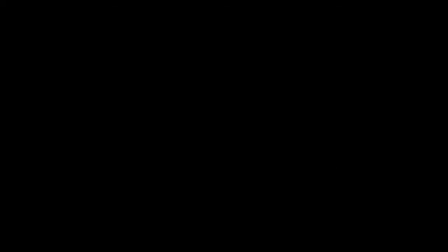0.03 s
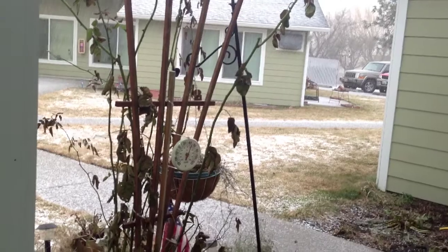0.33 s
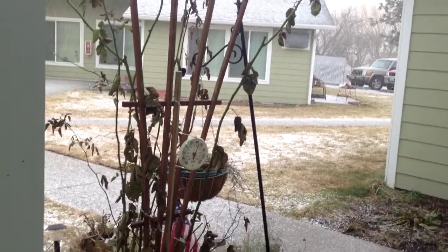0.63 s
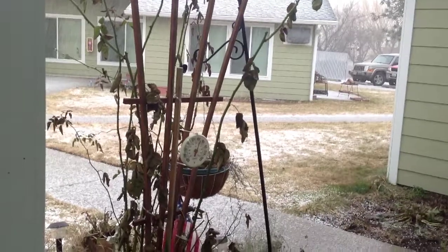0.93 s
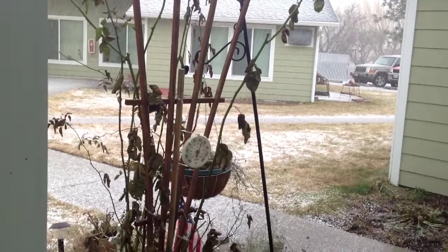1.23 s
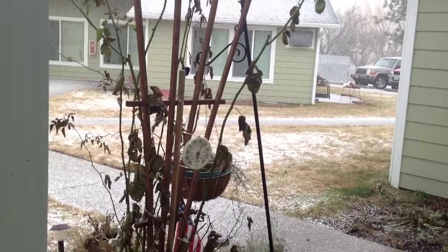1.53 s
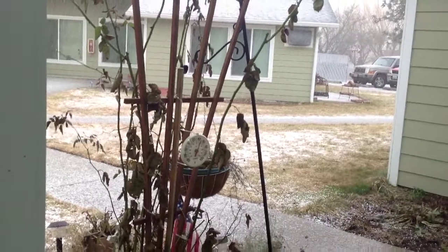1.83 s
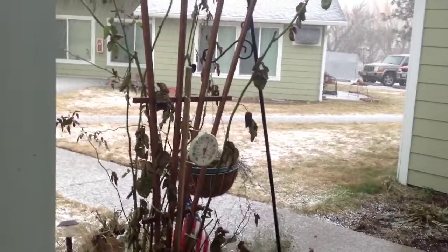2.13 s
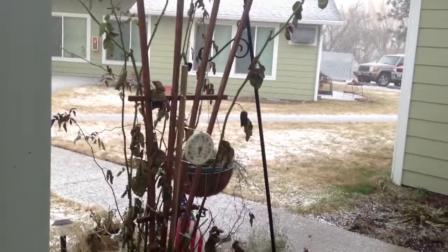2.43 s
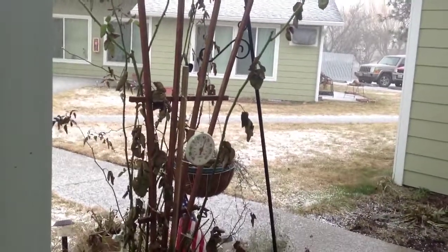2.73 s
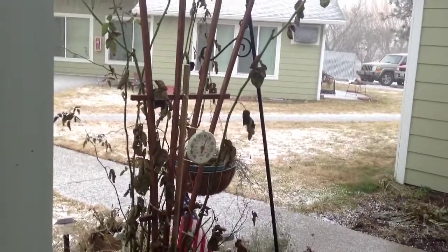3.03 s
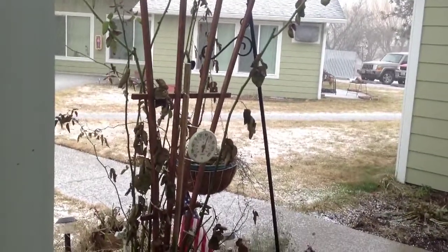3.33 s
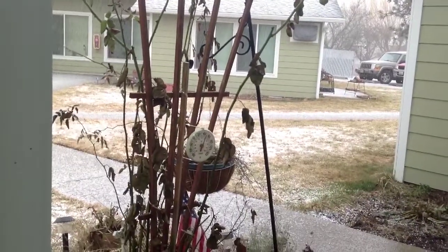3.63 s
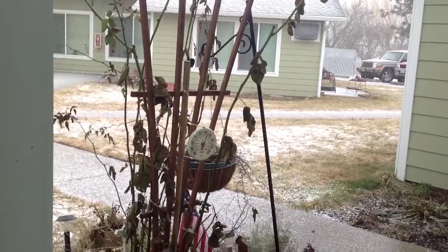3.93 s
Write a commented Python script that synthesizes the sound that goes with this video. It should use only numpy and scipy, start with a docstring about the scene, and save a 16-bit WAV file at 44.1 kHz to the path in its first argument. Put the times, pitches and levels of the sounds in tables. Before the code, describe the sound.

Dense small hail pattering on a roof and yard, with occasional sharper close hits.

```python
"""Small hail on a yard

Dense hail, heard in mono from a porch. Near pellets tap on roof and siding, knock on boards and
gutters and tick on the path and dry leaves; countless far ones merge into a wash.
Now and then a larger stone lands close by and scatters, or knocks on a board.
Twice something rings briefly near 1 kHz."""
import sys
import numpy as np
from scipy import signal
from scipy.fft import rfft, irfft, next_fast_len
from scipy.io import wavfile
from scipy.ndimage import uniform_filter1d

SR = 44100
rng = np.random.default_rng(int(sys.argv[2]) if len(sys.argv) > 2 else 0)


def generate_wav(signal):
    """Clip the signal to [-1, 1] and save it as 16-bit WAV at the path in sys.argv[1]."""
    frames = np.transpose(np.atleast_2d(signal))
    scaled = np.clip(frames, -1, 1) * 32767
    pcm = np.round(scaled).astype(np.int16)
    wavfile.write(sys.argv[1], SR, pcm)


N = 176400
TIME = np.arange(N) / SR

# Strength of the fall. Each row: time in seconds, gain of the body in dB, gain of the ticks in dB.
FALL_STRENGTH = [(.2, 0.7, -2), (.7, 0, 1.5), (1.05, 1, 1.5), (1.4, 0.3, -0.5), (1.9, 0, 0),
                 (2.32, 0.3, 1.5), (2.6, -0.06, -0.5), (3.05, -.5, 1.5), (3.45, -0.8, -1), (3.8, -0.5, -4),
                 (4, -0.3, 4.5)]
# Tone of the taps on roof and siding. Each row: frequency in Hz, relative gain in dB.
TAP_EQ = [(60, -69), (170, 5.5), (450, -8), (750, -2), (1550, 2.5), (2700, -2), (5000, -6.5), (8000, -25),
          (15000, -21)]
# Tone of the hollow knocks on boards and gutters. Each row: frequency in Hz, relative gain in dB.
KNOCK_EQ = [(150, -35), (450, -13.5), (850, -1), (1600, 1), (2700, -2), (4500, -15), (15000, -16)]
# Tone of the ticks on path and leaves. Each row: frequency in Hz, relative gain in dB.
TICK_EQ = [(100, -54), (600, -16), (1800, -7), (4000, -2.5), (7000, -6.5), (12000, -5), (15000, -7)]
# Tone of the far wash. Each row: frequency in Hz, relative gain in dB.
WASH_EQ = [(30, -43), (55, -39), (95, -25), (130, -11.5), (178, -4.5), (230, -5.5), (320, -3), (480, -2),
           (750, 0.5), (1050, 0), (2400, -1), (4500, -6), (7500, -10), (15000, -12.5)]
# Larger stones landing close by. Each row: start in seconds, level in dB, pitch in Hz,
# seconds for the scatter to fall 8 dB, level of the crunch over the scatter in dB.
STONE_HITS = [(0.6234, -30.5, 4630, 0.014, 13.5), (.691, -34, 5400, .012, 12), (.703, -38, 5700, .007, 8),
              (.708, -29, 4050, 0.013, 11), (.713, -37, 3800, 0.013, 11), (0.721, -30, 2760, .008, 14),
              (.91, -35, 11000, .008, 9), (1.002, -29.5, 6900, 0.013, 7), (1.022, -27, 3000, .007, 12.5),
              (1.023, -32, 5300, .008, 10), (1.034, -31, 5000, .008, 8), (1.039, -28, 2500, 0.021, 3),
              (1.162, -33, 2000, .012, 17.5), (1.229, -30, 8950, 0.014, 2), (1.263, -34, 10000, .015, 3),
              (1.286, -38, 8300, .007, 14), (1.499, -28.5, 8000, 0.013, 5), (1.622, -28.5, 2600, 0.011, 11),
              (1.627, -29, 2900, 0.013, 5), (1.642, -33, 5400, .006, 11), (1.757, -31, 5400, .03, 8),
              (1.775, -32, 10500, .016, 4), (2.097, -34, 6200, 0.011, 7), (2.190, -30.5, 4600, .005, 16),
              (2.276, -24.5, 13000, 0.016, 2), (2.277, -27, 4200, .014, 11), (2.2793, -33, 5400, 0.0077, 9),
              (2.283, -29, 2430, .03, 8), (2.3135, -30, 6600, .014, 9), (2.360, -33, 3600, .012, 14),
              (2.3677, -34, 4600, 0.023, 17.5), (2.379, -32, 4080, .02, 11), (2.375, -31, 12500, .022, 9),
              (2.465, -31, 12000, .011, 8), (2.559, -29.5, 2700, 0.012, 10), (2.644, -32.5, 3500, .01, 13),
              (2.714, -26.5, 11500, 0.0027, 7), (2.83, -35, 4900, .015, 9), (2.972, -33.5, 7100, 0.044, 5),
              (3.218, -29, 3000, 0.01, 2), (3.471, -34, 4800, .012, 7), (3.679, -32, 10000, 0.03, 2),
              (3.744, -30.5, 2270, .014, 9), (3.756, -31, 2450, .008, 12), (3.923, -32, 10000, 0.017, 7)]
# Stones knocking on wood. Each row: start in seconds, level in dB, lowest mode in Hz.
BOARD_KNOCKS = [(.454, -32, 600), (.7095, -28, 617), (.7135, -22, 1080), (1.051, -32, 620),
                (1.107, -32, 965), (1.162, -26, 1140), (1.167, -32, 1080), (1.176, -33, 900),
                (2.221, -28, 1500), (2.232, -28, 1150), (2.690, -26, 840), (3.568, -29, 670),
                (3.743, -31, 1240), (3.757, -31, 710)]
# Modes of a board. Each row: pitch as a ratio to the lowest mode, average gain in dB.
WOOD_MODES = [(1, -0.5), (1.68, 0), (2.35, -4), (3.4, -14)]
# Brief rings. Each row: start in seconds, pitch in Hz, peak in dB, hold in seconds,
# release in dB per second.
BRIEF_RINGS = [(0.717, 1070, -28.5, 0.006, 300), (1.35, 1028, -28.5, 0.058, 648)]


def hail():
    """Taps, hollow knocks and bright ticks over the far wash, all riding the strength of the fall."""
    times, body_db, tick_db = np.transpose(FALL_STRENGTH)
    body, treble = np.interp(TIME, times, body_db), np.interp(TIME, times, tick_db)
    wash = rng.standard_normal(N)
    taps = pellets(per_s=1700, spread_db=2, flurry_db=1.55, crack=.71,
                   cycles=12, range_hz=(614, 6340), pitches=24)
    knocks = pellets(per_s=450, spread_db=1.7, flurry_db=1.55, crack=.34,
                     cycles=52, range_hz=(554, 3166), pitches=40)
    ticks = pellets(per_s=1700, spread_db=1.66, flurry_db=1.83, crack=.8,
                    cycles=32, range_hz=(3000, 15200), pitches=40)
    return (from_db(-35.5 + body) * colour(splash(taps), TAP_EQ)
            + from_db(-38.5 + body) * colour(knocks, KNOCK_EQ)
            + from_db(-36 + treble) * colour(splash(ticks), TICK_EQ)
            + from_db(-29 + body) * colour(wash, WASH_EQ))


def pellets(per_s, spread_db, flurry_db, crack, cycles, range_hz, pitches):
    """Uneven impacts in small flurries; each clicks and rings, dying by 60 dB over `cycles` cycles."""
    size_db = spread_db * np.minimum(rng.exponential(1, N), 4.5)
    strength = from_db(size_db + flurry_db * drift(corner_hz=9.3))
    clicks = strength * rng.choice([-1, 1], N) * (rng.random(N) < per_s / SR)
    pitch_index = rng.integers(0, pitches, N)
    ringing = sum(resonate(clicks * (pitch_index == k), hz, np.log(1000) / np.pi * hz / cycles)
                  for k, hz in enumerate(np.geomspace(*range_hz, pitches)))
    return rms_one(ringing) + crack * rms_one(clicks)   # crack mixes in the bare contact click


def splash(impacts, t60_s=.06, hiss_db=-9):
    """Each impact trails a dying hiss of fine fragments."""
    power_decay = from_db(-120 / (t60_s * SR))
    envelope = np.sqrt(signal.lfilter([1 - power_decay], [1, -power_decay], impacts ** 2))
    return impacts + from_db(hiss_db) * envelope * rng.standard_normal(N)


def stones(shards_per_s=4000, crunch_t60_s=.005, size=8000):
    """A large stone lands with a pitched crunch; its shards and bounces die away in a wider band."""
    out = np.zeros(N + size)
    t = TIME[:size]
    crunch_decay = from_db(-60 * t / crunch_t60_s)
    for start_s, db, hz, scatter_s, crunch_db in STONE_HITS:
        shards = rng.standard_normal(size) * (rng.random(size) < shards_per_s / SR)
        scatter = rms_one(resonate(shards, hz, width_hz=.5 * hz)) * from_db(-8 * t / scatter_s)
        crunch = resonate(crunch_decay * rng.standard_normal(size), hz, width_hz=.18 * hz)
        crunch *= np.linalg.norm(crunch_decay) / np.linalg.norm(crunch)   # make-up gain
        i = int(start_s * SR)
        out[i:i + size] += from_db(db) * (scatter + from_db(crunch_db) * crunch)
    return low_cut(out[:N], hz=400)


def boards(click_db=3, ring_cycles=18, spread_db=3.6, size=4000):
    """A stone on wood: a click and a few quickly damped modes, mixed differently on every hit."""
    out = np.zeros(N + size)
    t = TIME[:size]
    for start_s, db, hz in BOARD_KNOCKS:
        knock = from_db(click_db - 60 * t * hz) * np.cos(2 * np.pi * hz * t)   # dies in one cycle
        for ratio, mode_db in WOOD_MODES:
            cycles = ratio * hz * t
            envelope = from_db(mode_db + rng.normal(0, spread_db) - 60 * cycles / ring_cycles)
            knock += envelope * np.sin(2 * np.pi * cycles)
        i = int(start_s * SR)
        out[i:i + size] += from_db(db) * knock
    return low_cut(out[:N], hz=350)


def rings(attack_s=.0032):
    """Short pure tones: fast attack, hold, quick release."""
    out = np.zeros(N)
    for start_s, hz, db, hold_s, release_db_per_s in BRIEF_RINGS:
        t = TIME - start_s
        attack = np.clip(t / attack_s, 0, 1)
        release_db = release_db_per_s * np.maximum(t - attack_s - hold_s, 0)
        out += attack * from_db(db - release_db) * np.sin(2 * np.pi * hz * t)
    return out


def porch(x, t60_s=.07, wet_db=-7):
    """Walls and ceiling add a short, diffuse reverb."""
    t = TIME[:SR // 4]
    tail = rng.standard_normal(len(t)) * from_db(-60 * t / t60_s)
    return x + from_db(wet_db) * signal.fftconvolve(x, tail / np.linalg.norm(tail))[:N]


def drift(corner_hz):
    """Quick random swings around zero, at unit rms."""
    pole = np.exp(-2 * np.pi * corner_hz / SR)
    swings = signal.lfilter([1], [1, -2 * pole, pole * pole], rng.standard_normal(N + SR))
    trend = uniform_filter1d(swings, size=SR // 5)
    return rms_one((swings - trend)[SR:])


def resonate(x, hz, width_hz):
    """One resonance, unity gain at its peak."""
    r, w = np.exp(-np.pi * width_hz / SR), 2 * np.pi * hz / SR
    feedforward = np.array([1, 0, -1]) * (1 - r * r) / 2
    return signal.lfilter(feedforward, [1, -2 * r * np.cos(w), r * r], x + 1e-18)


def colour(x, eq):
    """Minimum-phase EQ through (Hz, dB) points, so attacks stay sharp; comes out at unit rms."""
    size = 2 * next_fast_len(N)
    hz, db = np.transpose(eq)
    grid_hz = np.arange(size // 2 + 1) * SR / size
    gain = from_db(np.interp(np.log(grid_hz + 1), np.log(hz), db))
    cepstrum = irfft(np.log(gain))
    cepstrum[1:size // 2] *= 2   # fold onto positive time: no pre-ring
    cepstrum[size // 2 + 1:] = 0
    response = np.exp(rfft(cepstrum))
    return rms_one(irfft(rfft(x, size) * response)[:N])


def low_cut(x, hz):
    """Roll off the lows at 12 dB per octave."""
    return signal.sosfilt(signal.butter(2, hz, "high", fs=SR, output="sos"), x)


def from_db(db):
    """Decibels to gain."""
    return 10 ** (np.asarray(db) / 20)


def rms_one(x):
    """Scale to unit rms."""
    return x / np.sqrt(np.mean(x ** 2) + 1e-20)


def scene():
    """The hail bed, close hits in the porch reverb and the rings, alike in both channels."""
    return np.tile(hail() + porch(stones() + boards()) + rings(), (2, 1))


def record(dry):
    """A short silence, a snap fade-in and a steep high cut."""
    start_s, fade_s, cutoff_hz = .196, .004, 15400
    fade_in = np.clip((TIME - start_s) / fade_s, 0, 1)
    high_cut = signal.ellip(12, .1, 80, cutoff_hz, fs=SR, output="sos")
    return signal.sosfilt(high_cut, dry * fade_in)


dry = scene()
out = record(dry)
generate_wav(out)
```